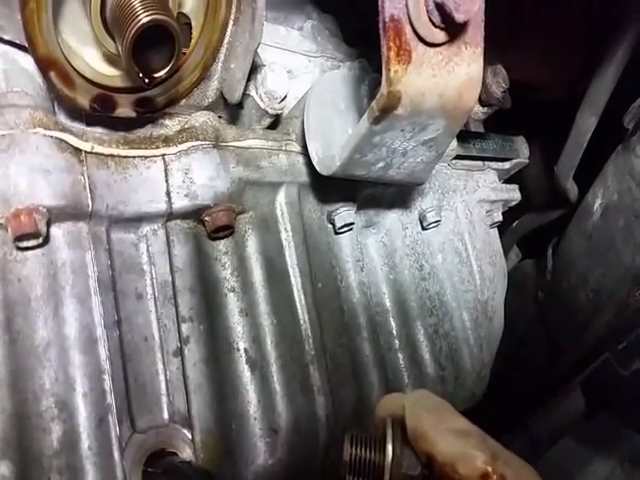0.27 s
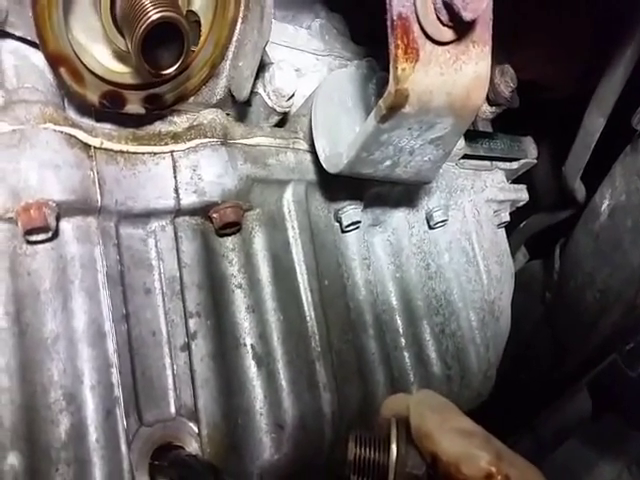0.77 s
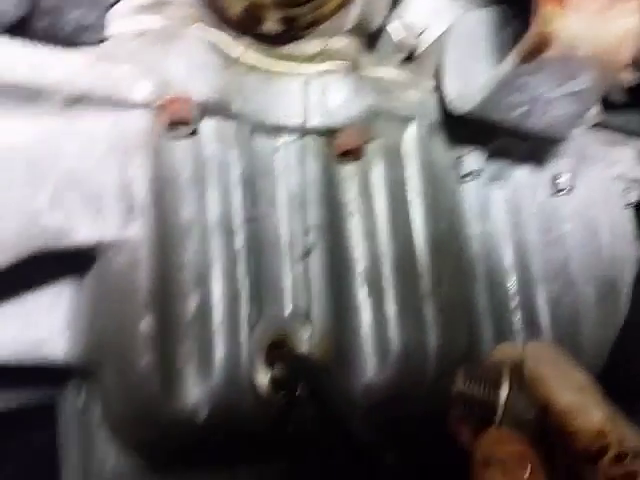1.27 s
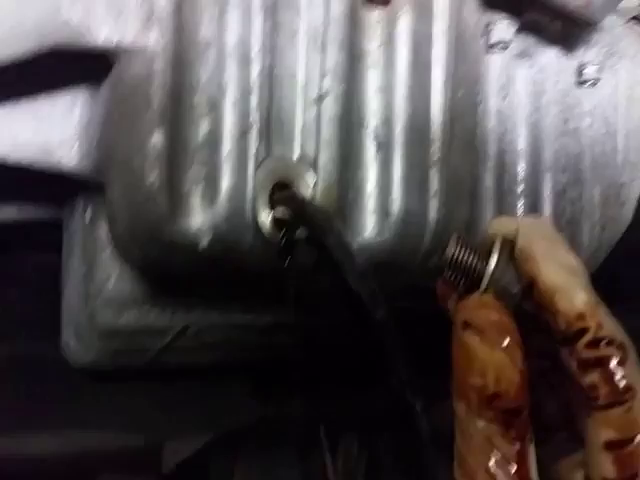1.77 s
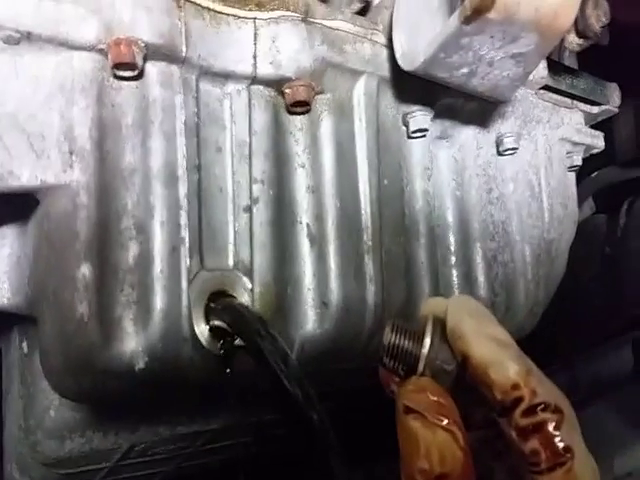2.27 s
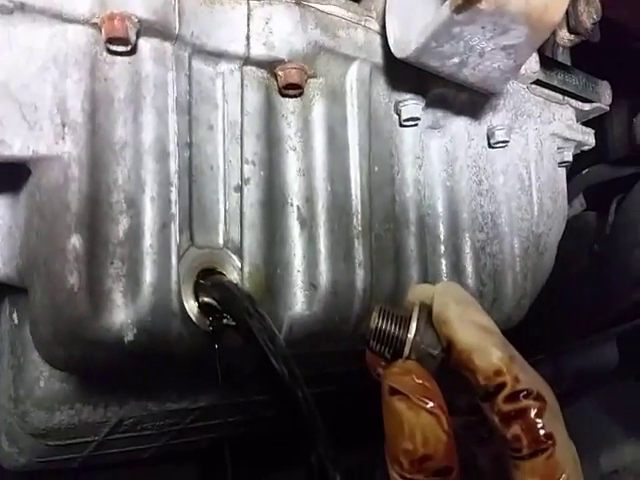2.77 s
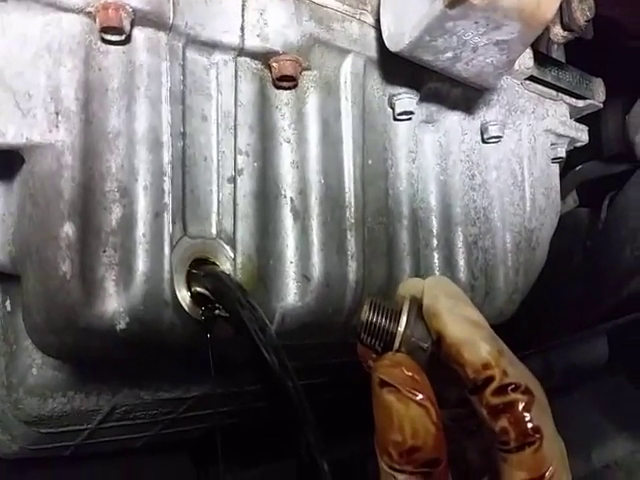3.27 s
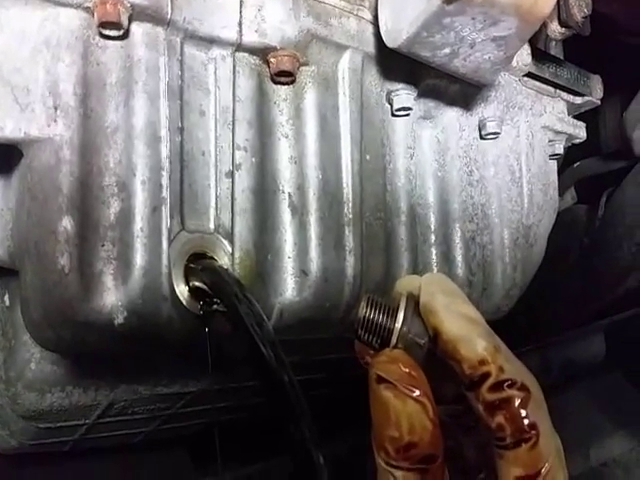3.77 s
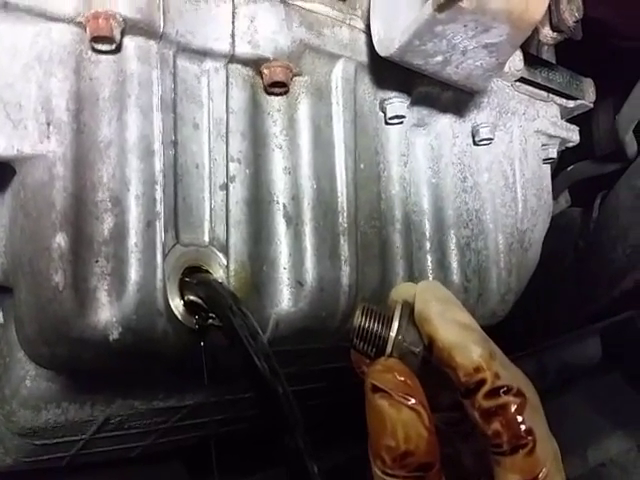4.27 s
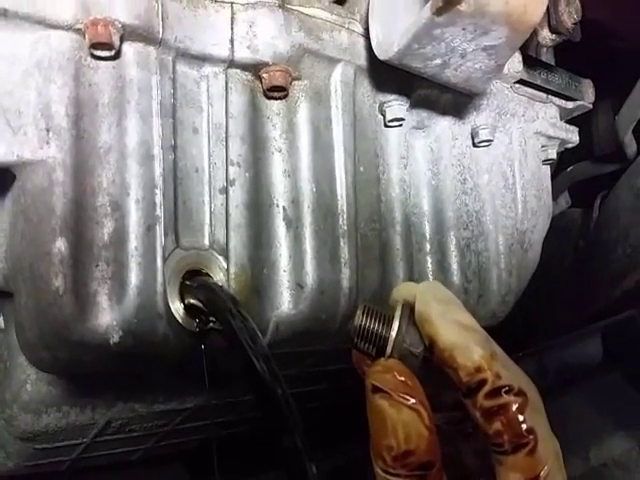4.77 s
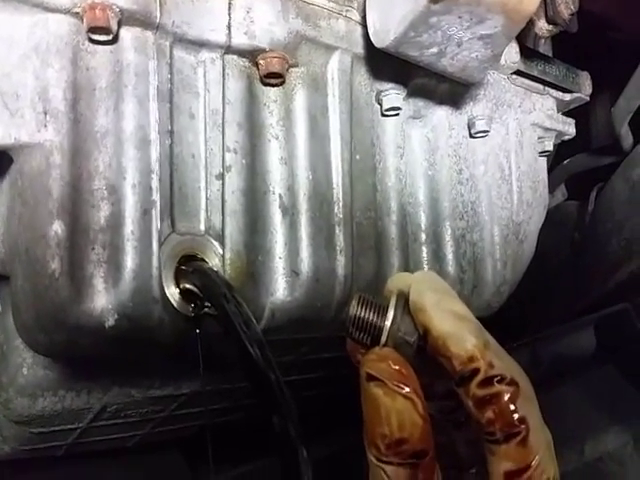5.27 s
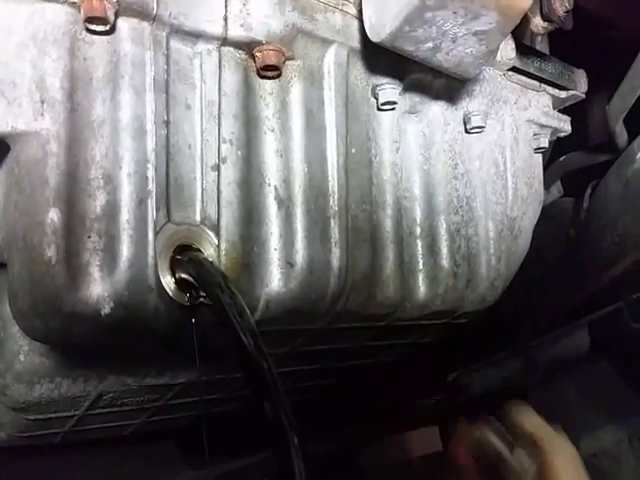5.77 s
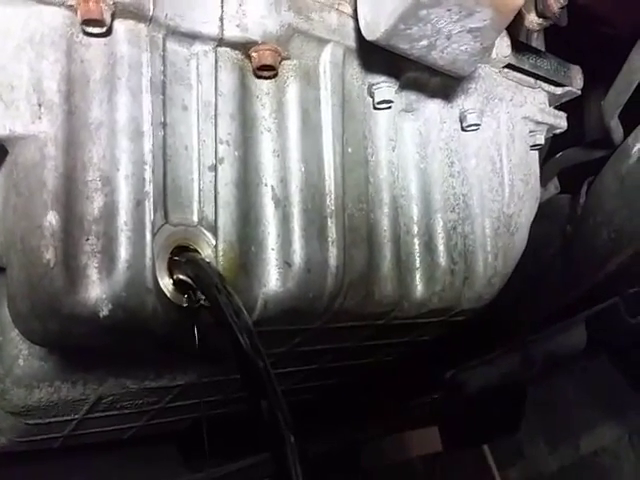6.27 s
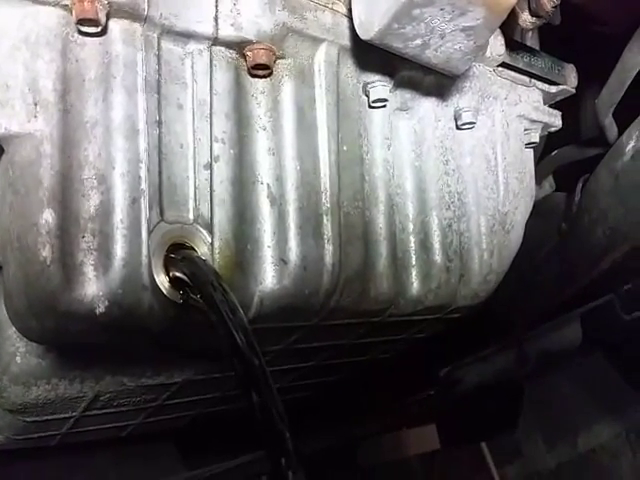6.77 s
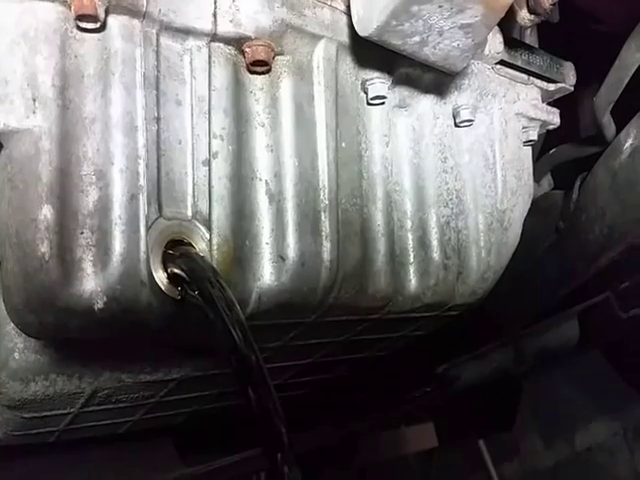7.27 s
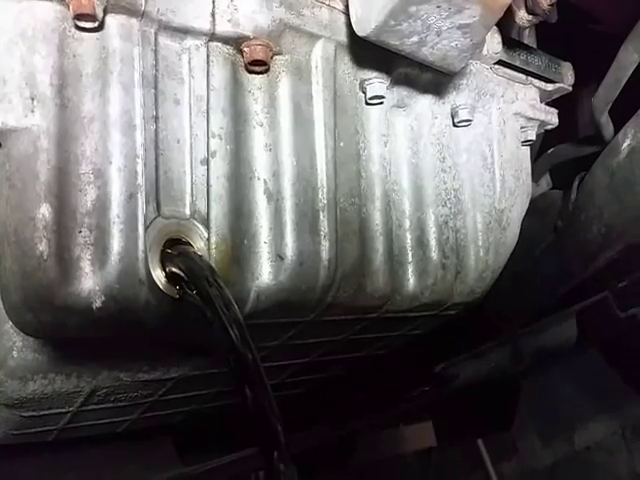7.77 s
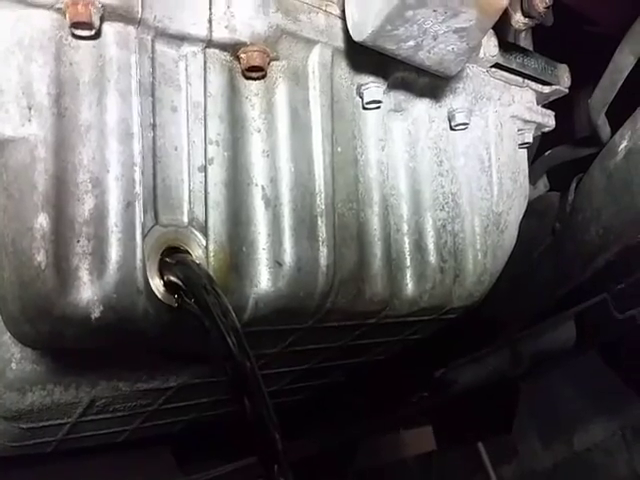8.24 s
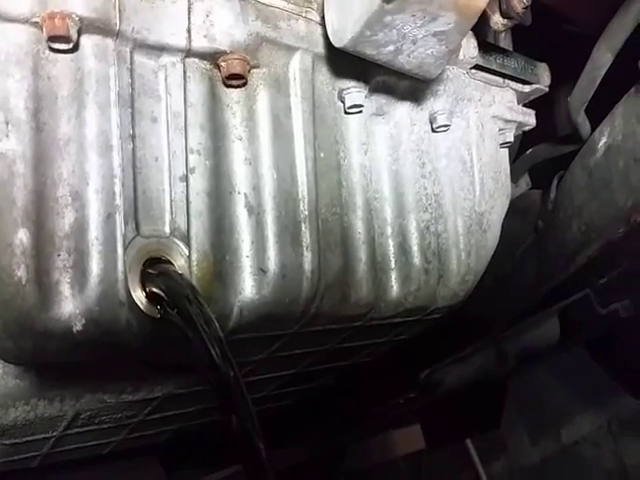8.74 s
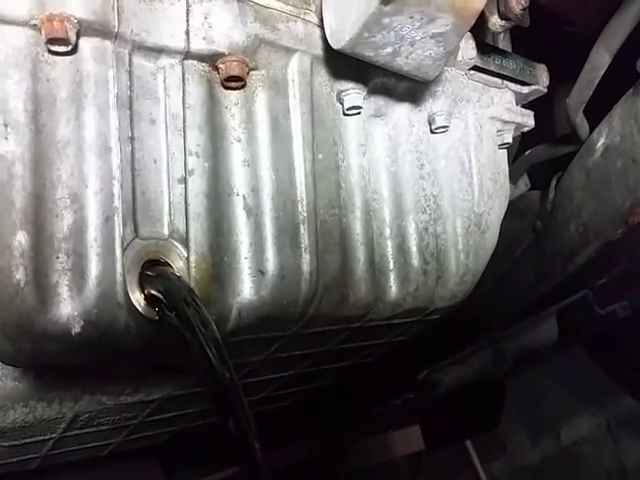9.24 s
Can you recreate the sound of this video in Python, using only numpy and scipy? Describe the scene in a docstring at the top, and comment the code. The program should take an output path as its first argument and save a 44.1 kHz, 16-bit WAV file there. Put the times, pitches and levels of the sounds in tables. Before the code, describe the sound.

A close, hand-held stereo microphone sits beneath a car. At first there is faint air and low rumble, with a tiny knock at the start; a wavering deep hum swells around 1 second. At 1.3-1.6 a dull knock, a soft thud and two quick cloth rasps mark a hand moving. From about 2.2 oil splashes into a hollow pan slightly right: small high bubble chirps, crisp ticks and watery pops, ringing with short echoes over a faint soft rush. It grows gradually denser, easing briefly near 4.4. Muffled bumps land at 3.0, 3.8, 5.7 and 6.1-6.2, with light knocks near 3.6. From 6.1 to 6.8 lower glugs, thick spatter and bright snaps peak, then splashing stops. Knocks follow near 7.0; the rush fades around 7.6. Hum and rumble continue, with a faint cloth stroke, squeak and thud around 8.7 and tiny taps at 9.

```python
"""Warm engine oil runs from a sump into a catch pan under a car, heard from a hand-held camera close by.
For some seconds it splashes: bubbles chirp as sweeping sines, films pop and film snaps tick as noise bursts,
thicker gobs spatter as grainy noise, and all of it rings in the resonances and echoes of the pan.
Wavering tones and filtered noise make the workshop's hum, rumble and air; the hand bumps the camera with
sinking thuds, handled things knock as damped noise; coloured noise makes sleeve strokes and a soft long rush."""
import sys
import numpy as np
from scipy import signal
from scipy.fft import rfft, irfft, next_fast_len
from scipy.io import wavfile
from scipy.ndimage import uniform_filter1d

SR = 44100
rng = np.random.default_rng(int(sys.argv[2]) if len(sys.argv) > 2 else 0)


def master_out(mix):
    """Clip the mix to full scale and print it as 16-bit PCM to the path in sys.argv[1]."""
    frames = np.transpose(np.atleast_2d(mix))
    ceiling = np.clip(frames, -1, 1)
    pcm = np.round(ceiling * 32767).astype(np.int16)
    wavfile.write(sys.argv[1], SR, pcm)


N = 419346
TIME = np.arange(N) / SR

SPOT_COUNT = 4  # places in the pan where the oil splashes
# the stream splashes between these times, with these fades
SPLASH_START_S, SPLASH_STOP_S, SPLASH_ATTACK_S, SPLASH_RELEASE_S = 2.17, 6.8, 0.083, 0.09
FLOW_DB = -66  # relative strength of the stream as it starts, before the pan's own gain
SNAP_S = 0.00043  # decay of a film's sharp snap

# Spectrum of fine fizz and spray. Each row: frequency in Hz, level in dB.
FIZZ_SPECTRUM = [(600, -18), (1300, -4.5), (2600, -9), (4200, -7), (5200, -7.5), (8000, -6), (12500, -14.5),
                 (16000, -20)]


def undb(db):
    """Decibels to gain."""
    return 10 ** (np.asarray(db) / 20)


def unit(x):
    """Scale to rms 1."""
    return x / np.sqrt(np.mean(x ** 2))


def curve(table):
    """Rows of (s, value), joined by straight lines in time."""
    return np.interp(TIME, *np.transpose(table))


def colour(x, points):
    """Filter by a spectrum of (Hz, dB) points; rms 1."""
    hz, db = np.transpose(points)
    size = next_fast_len(N)
    f = np.maximum(np.fft.rfftfreq(size, 1 / SR), 1)
    gain = undb(np.interp(np.log(f), np.log(hz), db))
    return unit(irfft(rfft(x, size) * gain, size)[..., :N])


def resonate(x, hz, q):
    """One resonance, gain 1 at its centre."""
    w = 2 * np.pi * min(hz / SR, 0.45)
    a = np.sin(w) / (2 * q)
    return signal.lfilter([a, 0, -a], [1 + a, -2 * np.cos(w), 1 - a], x)


def walk(rate):
    """Random levels, a new one every 1 / rate s, joined by smooth slews; rms near 1."""
    k = int(SR / rate)
    steps = np.repeat(rng.standard_normal(N // k + 1), k)
    return unit(uniform_filter1d(steps, k)[:N])


def pan(x, left_db):
    """Lean a sound to the left by so many dB; negative leans right."""
    return x * undb(np.array([[left_db], [-left_db]]) / 2)


def stereo_noise(side_db):
    """White noise on two channels, with the side part at so many dB against the middle."""
    mid, side = rng.standard_normal((2, N))
    return mid + undb(side_db) * np.array([side, -side])


def add(track, s, sound):
    """Mix a sound in at a time."""
    i = int(s * SR)
    track[..., i:i + sound.shape[-1]] += sound[..., :N - i]


def echoes(x, t60, gap_s):
    """Dense decaying reflections that start after a gap, different at each ear; energy 1."""
    t = np.arange(SR // 2) / SR
    tail = rng.standard_normal((2, len(t))) * undb(-60 * t / t60) * (t > gap_s)
    tail /= np.sqrt(np.sum(tail ** 2, axis=1, keepdims=True))
    return signal.fftconvolve(np.atleast_2d(x), tail, axes=1)[:, :N]


def swell(s, width_s):
    """A gain that rises to 1 at a time and dies away again."""
    return 1 / np.cosh(np.clip((TIME - s) / width_s, -30, 30))


def hold(start_s, stop_s, attack_s, release_s):
    """Straight attack, hold and exponential release."""
    attack = np.clip((TIME - start_s) / attack_s, 0, 1)
    return attack * np.exp(-np.maximum(TIME - stop_s, 0) / release_s)


def flow(growth_db_per_s=1.6, lull_s=4.42, lull_width_s=0.15, lull_db=-11):
    """How hard the stream splashes: it grows as the pan fills and runs more smoothly for one moment."""
    db = FLOW_DB + growth_db_per_s * (TIME - SPLASH_START_S) + lull_db * swell(lull_s, lull_width_s)
    return undb(db) * hold(SPLASH_START_S, SPLASH_STOP_S, SPLASH_ATTACK_S, SPLASH_RELEASE_S)


def tone(hz, drift_hz=0.47, waver_db=3.0):
    """A humming line that wavers slightly in pitch and level; rms near 1."""
    phase = 2 * np.pi * np.cumsum(hz + drift_hz * walk(2.98)) / SR
    return np.sqrt(2) * np.sin(phase) * undb(waver_db * walk(6))


def workshop():
    """Hum is alike at both ears and rumble nearly so; stream and hand add to the rumble; the air is diffuse."""
    # The main hum swelling and fading. Each row: time in seconds, relative level in dB.
    hum_levels = [(0, -71), (.62, -69), (.8, -50), (1.3, -44.5), (2.0, -51.5), (2.65, -47), (3.2, -50.5),
                  (4.3, -62.5), (5.0, -52.5), (6.2, -57), (7.9, -53.5), (9.5, -71)]
    # Steady tones beside it. Each row: frequency in Hz, relative level in dB.
    side_tones = [(58.3, -62), (99, -60.5), (129.5, -69)]
    # Rumble of the shifting hand. Each row: centre in seconds, relative level in dB, swell width in seconds.
    hand_shifts = [(1.45, -51.5, 0.76), (2.9, -54.5, 0.34), (7.3, -54, 0.71), (8.72, -54, 0.15)]
    # Spectrum of the rumble. Each row: frequency in Hz, level in dB.
    rumble_spectrum = [(12, -14), (22, -4), (44, -16.5), (58, 0), (100, 2.5), (160, -3.5), (205, -12.5),
                       (280, -11.5), (360, -17.5), (480, -20.5), (700, -45), (1500, -59.5)]
    # Spectrum of still air and microphone hiss. Each row: frequency in Hz, level in dB.
    air_spectrum = [(200, 4.5), (450, 3.5), (850, 4.5), (1200, -8), (2000, -12.5), (3000, -17.5),
                    (4400, -12.5), (5300, -33.5), (7500, -20), (10000, -40), (12500, -18), (16000, -31.5)]
    hum = tone(hz=82.24) * undb(curve(hum_levels) - 1.5)
    hum = hum + sum(undb(db) * tone(hz) for hz, db in side_tones)

    steady = undb(-55)
    drumming = undb(9) * flow()  # the stream drums on the pan
    shifts = sum(undb(db) * swell(s, width_s) for s, db, width_s in hand_shifts)
    strength = np.sqrt(steady ** 2 + drumming ** 2 + shifts ** 2)
    rumble = colour(stereo_noise(side_db=-9.5), rumble_spectrum) * strength * undb(0.78 * walk(12))

    air = colour(stereo_noise(side_db=0.5), air_spectrum) * undb(-67.5 + 1.3 * walk(13.0))
    return pan(hum + rumble, left_db=-2.0) + pan(air, left_db=-2.0)


def chirp(hz, length_s, octaves, swell_age=0.54, rough=0.45):
    """A bubble's air rings through the hole in its film; pitch glides and flutters as the ragged hole widens."""
    age = np.arange(int(4 * length_s * SR)) / SR / length_s  # in lengths
    smoothing = int(2 * SR / hz)
    flutter, wobble = (unit(uniform_filter1d(row, size=smoothing))
                       for row in rng.standard_normal((2, len(age))))
    pitch = hz * 2 ** (octaves * np.tanh(age - swell_age) + rough * wobble / 10)
    shape = (age / swell_age * np.exp(1 - age / swell_age)) ** 2
    return shape * (1 + rough * flutter) * np.sin(2 * np.pi * np.cumsum(pitch) / SR)


def sleeve_and_rush():
    """Cloth strokes rasp and squeak in uneven steps over a long faint rush, likely the pouring oil's low body."""
    # Strokes of the sleeve. Each row: centre in seconds, relative level in dB, relative hiss of the weave
    # in dB, swell width in seconds.
    stroke_rows = [(1.505, -51, -69, 0.028), (1.588, -55.5, -68, 0.04), (1.87, -72.5, -93, 0.15),
                   (3.8, -65, -83, 0.093), (8.8, -63.5, -91, 0.13)]
    # Spectrum of the strokes and the rush. Each row: frequency in Hz, level in dB.
    soft_spectrum = [(120, -3), (245, 9.5), (330, -3), (450, 1), (900, -5.5), (1400, -10.5), (2500, -20),
                     (4600, -20), (6200, -33), (15000, -46)]
    strokes = sum(undb(db) * swell(s, width_s) for s, db, _, width_s in stroke_rows)
    hiss = sum(undb(db) * swell(s, width_s) for s, _, db, width_s in stroke_rows)
    # a long faint soft rush, likely the low body of the pouring oil
    rush = undb(-64) * hold(start_s=0.77, stop_s=7.56, attack_s=0.59, release_s=0.59)
    soft = colour(stereo_noise(side_db=0.0), soft_spectrum) * (strokes + rush)
    weave = rng.standard_normal((2, N))
    for _ in range(2):
        weave = resonate(weave, hz=4250, q=4)
    squeak = undb(-80) * chirp(hz=3650, length_s=0.06, octaves=-0.3)  # falls in pitch
    add(soft, 8.61, squeak)
    return (soft + unit(weave) * hiss) * undb(1.35 * walk(45))


def knocks():
    """Light knocks of things being handled: short damped noise with a little of the space under the car."""
    # Each row: start in seconds, centre in Hz, relative level in dB, decay in seconds.
    knock_rows = [(0.023, 2000, -57, 0.0041), (0.165, 4170, -70, 0.003), (1.274, 386, -36.5, 0.0065),
                  (1.276, 860, -55, 0.016), (1.293, 2900, -60, 0.004), (1.308, 840, -53.5, 0.017),
                  (1.392, 368, -42.5, 0.011), (1.822, 3200, -64, 0.01), (1.824, 1090, -60, 0.02),
                  (2.042, 1660, -58, 0.0043), (3.555, 410, -43.5, 0.0099), (3.584, 900, -45.5, 0.0065),
                  (3.762, 1370, -54.5, 0.017), (6.133, 950, -47.5, 0.011), (6.937, 690, -47.5, 0.013),
                  (6.955, 1720, -44.5, 0.0049), (6.956, 900, -46.5, 0.0083), (7.033, 2460, -59.5, 0.021),
                  (9.024, 840, -56, 0.011), (9.044, 900, -58.5, 0.012), (9.122, 4400, -70, .004)]
    out = np.zeros(N)
    t = np.arange(SR // 10) / SR
    for (s, hz, db, decay_s), noise in zip(knock_rows, rng.standard_normal((len(knock_rows), len(t)))):
        body = unit(resonate(resonate(noise, hz, 4.1), hz, 0.77))
        add(out, s, undb(db - 3.0) * body * np.exp(-t / decay_s))
    return pan(out + undb(-3.0) * echoes(out, t60=0.059, gap_s=0.0087), left_db=-7.5)


def bumps(rise_s=0.0033, sag=0.2):
    """The hand bumps the camera body, which gives a soft dull thud that sinks in pitch and dies fast."""
    # Each row: start in seconds, pitch it sinks to in Hz, relative level in dB.
    bump_rows = [(1.385, 154, -36.5), (2.986, 100, -39), (3.791, 110, -33.5), (5.741, 124, -33),
                 (6.115, 94, -33.5), (6.23, 99, -34.5), (8.667, 89.5, -40.5)]
    out = np.zeros(N)
    t = np.arange(SR // 10) / SR
    shape = t / rise_s * np.exp(1 - t / rise_s)
    for (s, hz, db), noise in zip(bump_rows, rng.standard_normal((len(bump_rows), len(t)))):
        phase = 2 * np.pi * np.cumsum(hz * (1 + sag * np.exp(-t / 0.0044))) / SR
        dull_noise = unit(resonate(resonate(noise, 213, 1.3), 213, 1.3))
        thud = np.sin(phase) + undb(-9.0) * dull_noise
        add(out, s, undb(db) * thud * shape)
    return pan(out, left_db=11.0)


def crackle(grain_db):
    """Fine crackling: noise whose size changes about every millisecond, up to a largest grain."""
    size = np.minimum(walk(900), 2)
    return rng.standard_normal(N) * undb(grain_db * size)


def spatter(grain_db=5, spray_lag=1.54):
    """Thick gobs slosh low in the pan; bright spray follows in a shorter burst. Returns slosh and spray."""
    # Each row: slosh centre in seconds, relative slosh in dB, relative spray in dB, swell width in seconds.
    gobs = [(6.252, -53, -57, 0.021), (6.39, -50.5, -66, 0.017), (6.439, -45, -39.5, 0.028),
            (6.64, -57.5, -87, 0.13)]
    # Spectrum of the slosh. Each row: frequency in Hz, level in dB.
    slosh_spectrum = [(120, -16), (280, 0.5), (480, -1), (750, -5.5), (1600, -13.5), (2600, -13),
                      (5000, -21.5), (12000, -30)]
    slosh = sum(undb(db) * swell(s, width_s) for s, db, _, width_s in gobs)
    # the spray lands spray_lag swell widths after its gob
    spray = sum(undb(db) * swell(s + spray_lag * width_s, 0.42 * width_s) for s, _, db, width_s in gobs)
    low = colour(crackle(grain_db), slosh_spectrum) * slosh * undb(walk(90))
    bright = colour(crackle(grain_db), FIZZ_SPECTRUM) * (spray + undb(-7.5) * slosh)
    return low, bright


def patter(count=130, scatter_db=12.5):
    """Lesser clicks fall at random as tiny decaying noise bursts; rms near 1 over all spots together."""
    # Spectrum of the lesser clicks. Each row: frequency in Hz, level in dB.
    patter_spectrum = [(1200, -9.5), (4000, -5), (16000, -9.5)]
    out = np.zeros((SPOT_COUNT, N))
    t = np.arange(SR // 100) / SR
    for noise in rng.standard_normal((count, len(t))):
        when, size, place = rng.random(3)
        click = undb(scatter_db * size) * noise * np.exp(-t / SNAP_S)
        add(out[int(place * SPOT_COUNT)], when * N / SR, click)
    return colour(out, patter_spectrum) / np.sqrt(SPOT_COUNT)


def film_snaps(ring_q=6.9, ring_db=1.5, tail_s=0.0027, tail_db=-8):
    """A bubble's film snaps with a very short bright click of its own pitch and a fainter, longer tail."""
    # Each row: start in seconds, relative level in dB.
    snap_rows = [(2.2605, -46), (2.53, -51), (2.6547, -44), (2.9532, -44), (3.0, -57), (3.0299, -50),
                 (3.1398, -48), (3.3793, -47.5), (3.463, -50), (3.507, -40.5), (3.673, -53), (3.7099, -46),
                 (3.816, -49), (3.906, -44.5), (4.0308, -44.5), (4.0722, -44), (4.766, -51), (4.8, -40),
                 (4.9935, -55), (5.0234, -56), (5.266, -43.5), (5.308, -42), (5.456, -36), (5.5572, -51),
                 (5.7085, -36.5), (5.791, -45), (5.845, -50), (5.9417, -48), (6.033, -49), (6.2601, -42.5),
                 (6.529, -40.5), (6.636, -42), (6.66, -37.5), (6.7, -30), (6.736, -34), (6.7665, -39),
                 (7.9328, -58.5)]
    # Spectrum of the snaps. Each row: frequency in Hz, level in dB.
    snap_spectrum = [(1000, -19), (3000, -2), (8000, 2.5), (11500, 3), (16000, -2)]
    out = np.zeros((SPOT_COUNT, N))
    t = np.arange(SR // 50) / SR
    shape = np.exp(-t / SNAP_S) + undb(tail_db) * np.exp(-t / tail_s)
    for (s, db), noise in zip(snap_rows, rng.standard_normal((len(snap_rows), len(t)))):
        hz = 11540 * 2 ** (0.23 * rng.uniform(-0.96, 1))
        burst = shape * noise
        click = unit(burst) + undb(ring_db) * unit(resonate(burst, hz, ring_q))
        add(out[rng.integers(SPOT_COUNT)], s, undb(db) * np.std(shape) * unit(click))
    return colour(out, snap_spectrum) * np.std(out)


def pops(decay_s=0.0011, squirt_db=-7, squirt_s=0.0029, climb=0.89):
    """Air squirts through a thinning film in a rising whistle, then the film pops."""
    # Each row: time of the pop in seconds, relative level in dB, centre in Hz.
    pop_rows = [(1.0348, -47.5, 7060), (2.2588, -44.5, 7960), (2.332, -44.5, 8320), (2.406, -44, 8300),
                (2.6558, -44, 8290), (2.893, -48, 6400), (2.995, -44.5, 8300), (3.086, -48, 6370),
                (3.1417, -48, 8070), (3.453, -47, 7090), (3.4633, -52, 5720), (3.508, -42, 8330),
                (3.588, -41.5, 7090), (3.711, -43.5, 8350), (3.752, -46, 8420), (3.816, -43, 6000),
                (3.907, -42.5, 7080), (4.03, -56, 5940), (4.072, -42.5, 5950), (4.322, -45.5, 7640),
                (4.6582, -40, 6470), (4.7665, -47, 5880), (4.802, -42, 10600), (4.914, -42.5, 5960),
                (5.4557, -41.5, 8430), (5.5994, -37, 8150), (5.7069, -36, 5910), (5.7647, -42, 5940),
                (5.831, -42, 5580), (5.942, -50, 5770), (6.003, -43, 7050), (6.021, -40.5, 6130),
                (6.1134, -37.5, 5920), (6.206, -36.5, 6600), (6.631, -36.5, 6870), (6.6598, -36, 7240),
                (6.6986, -36, 8410), (6.738, -35, 5300), (6.766, -45, 6260), (6.879, -42, 7900)]
    out = np.zeros((SPOT_COUNT, N))
    t = np.arange(-SR // 50, SR // 50) / SR  # 0 at the pop
    shape = (t >= 0) * np.exp(-np.abs(t) / decay_s)
    swelling = np.where(t < 0, np.exp(t / squirt_s), shape)
    for (s, db, hz), noise in zip(pop_rows, rng.standard_normal((len(pop_rows), len(t)))):
        # a bright snap at the film's own pitch over a broader splash
        burst = shape * noise
        snap = unit(resonate(burst, hz, 6.0)) + undb(-12) * unit(resonate(burst, hz, 0.84))
        pitch = hz * 2 ** (climb * np.tanh(t / 0.0092))
        whistle = np.sin(2 * np.pi * np.cumsum(pitch) / SR)
        unsteady = 1 + 0.5 * unit(uniform_filter1d(noise, size=16))
        squirt = undb(squirt_db) * swelling * whistle * unsteady
        add(out[rng.integers(SPOT_COUNT)], s + t[0], undb(db) * (np.std(shape) * unit(snap) + squirt))
    return out


def froth(count=700):
    """Many faint quick bubbles in the foam, mostly middling; big low ones glide less. Rms 1 when summed."""
    out = np.zeros((SPOT_COUNT, N))
    for when, first, second, size, length, place in rng.random((count, 6)):
        smallness = ((first + second) / 2) ** 1.5
        hz = 1650 * 2 ** (2.5 * smallness)
        blip = chirp(hz, (6 + 12 * length) / hz, octaves=0.12 + 1.22 * smallness)
        add(out[int(place * SPOT_COUNT)], when * N / SR, undb(21.3 * size ** 2) * blip)
    return out / np.std(out.sum(axis=0))


def scatter(count):
    """Lesser bubbles at uneven gaps while the stream splashes, following its flow: rows (s, dB, Hz)."""
    # One row: level above the flow in dB, scatter in dB, middle pitch in Hz, scatter in octaves.
    small_kind = (9, 2.5, 2850, 0.4)
    above_db, spread_db, hz, octaves = small_kind
    when, size, pitch = rng.standard_normal((count, 3)).T
    span = [SPLASH_START_S + SPLASH_ATTACK_S, SPLASH_STOP_S + SPLASH_RELEASE_S]
    s = np.interp(np.arange(count) + 0.5 * when, [0, count], span)
    flow_db = 20 * np.log10(np.interp(s, TIME, flow()) + 1e-9)
    db = flow_db + above_db + spread_db * np.clip(size, -2, 1)
    return np.column_stack([s, db, hz * 2 ** (octaves * np.clip(pitch, -2, 2))])


def bubbles(small, lead=0.2022):
    """Bubbles chirp as they open, from low glugs to high blips; bigger ones ring longer and tend to climb less."""
    # The clear bubbles. Each row: time in seconds, relative level in dB, pitch in Hz.
    clear = [(2.221, -50, 2400), (2.359, -54, 2880), (2.376, -53, 3900), (2.458, -38.5, 3500),
             (2.4665, -40.5, 2870), (2.472, -42.5, 4170), (2.603, -49.5, 3500), (2.655, -45.5, 3100),
             (2.878, -56, 3040), (2.926, -54, 3150), (2.988, -47, 3040), (2.998, -46, 2670),
             (3.034, -50.5, 2550), (3.134, -42, 2860), (3.139, -43, 1983), (3.191, -46.5, 3760),
             (3.3005, -43.5, 3640), (3.328, -48, 3040), (3.38, -51, 2750), (3.463, -41.5, 4250),
             (3.464, -47.5, 2310), (3.496, -49, 2410), (3.51, -51, 2870), (3.576, -51.5, 2610),
             (3.593, -48, 2545), (3.643, -49, 3780), (3.658, -50, 2480), (3.721, -42, 3800),
             (3.793, -49.5, 2970), (3.811, -45, 4300), (3.907, -49.5, 2325), (3.945, -46, 2660),
             (3.959, -40.5, 3410), (4.0716, -51, 3050), (4.1175, -47.5, 2960), (4.198, -51, 2850),
             (4.3236, -46, 2780), (4.36, -51, 2310), (4.388, -44.5, 2670), (4.389, -52, 3920),
             (4.489, -50, 4280), (4.649, -41, 3900), (4.7177, -41, 2750), (4.733, -45.5, 3870),
             (4.7668, -44, 2060), (4.805, -45, 3830), (4.815, -46, 2300), (4.854, -49, 2990),
             (4.894, -42.5, 2970), (4.904, -41, 2120), (4.909, -37, 3780), (4.937, -51, 3000),
             (4.992, -48, 3600), (4.994, -43.5, 1997), (5.034, -50.5, 2050), (5.057, -45.5, 3040),
             (5.091, -52, 3700), (5.1486, -46.5, 3070), (5.2035, -51, 3800), (5.205, -56, 2270),
             (5.307, -40.5, 3640), (5.373, -50.5, 2950), (5.5034, -44, 2700), (5.519, -44.5, 3970),
             (5.5986, -48.5, 2390), (5.6355, -43.5, 2440), (5.666, -50, 2070), (5.7069, -47.5, 2710),
             (5.722, -49, 4390), (5.765, -49, 3930), (5.7992, -47, 2880), (5.9439, -38, 2170),
             (6.048, -43, 4420), (6.0841, -38, 2240), (6.1465, -37, 1630), (6.1903, -42, 4240),
             (6.223, -50.5, 2880), (6.296, -51.5, 1610), (6.343, -45.5, 1590), (6.3719, -42.5, 4020),
             (6.5355, -44, 3500), (6.541, -47, 1580), (6.575, -44, 1550), (6.602, -44, 2400),
             (6.6343, -41, 1890), (6.6595, -38.5, 3040), (6.6996, -41.5, 2980), (6.741, -51, 1980),
             (6.769, -44.5, 3820), (6.846, -40.5, 1547), (6.874, -46.5, 1466)]
    # a bubble of ring_hz rings for about ring_s and climbs by about rise_octaves
    ring_hz, ring_s, ring_power = 2814, 0.0057, 0.91
    rise_octaves, rise_power = 0.33, 2.2
    out = np.zeros((SPOT_COUNT, N))
    rows = np.vstack([clear, small])
    for (s, db, hz), (damping, steepness, place) in zip(rows, rng.random((len(rows), 3))):
        length_s = ring_s * (ring_hz / hz) ** ring_power * 2 ** (0.5 * (damping - 0.5))
        octaves = rise_octaves * (hz / ring_hz) ** rise_power * 2 ** (1.5 * (steepness - 0.5))
        sound = undb(db) * chirp(hz, length_s, octaves)
        add(out[int(place * SPOT_COUNT)], s - lead * length_s, sound)
    return out


def trickle():
    """All splashing sounds ring in the pan and bounce between floor and underbody."""
    # Hollow resonances of the pan and the gap above it. Each row: frequency in Hz, Q, relative level in dB.
    pan_modes = [(1658, 24, -3.5), (2020, 51, -5.5), (2285, 56, -10), (2670, 140, -8.5), (2945, 76, 3),
                 (3250, 110, -11.5), (3870, 25, -3.5), (5920, 26, -3.5), (8280, 37, -2)]
    spots = bubbles(scatter(count=90)) + pops() + undb(3.5) * film_snaps()
    spots += flow() * (undb(-4) * froth() + undb(-5) * patter())
    slosh, spray = spatter()
    spots[0] += undb(-13) * flow() * colour(crackle(grain_db=10), FIZZ_SPECTRUM)
    spots[1] += spray
    spots[2] += slosh
    # foam fizzles on after the splashing
    foam = undb(FLOW_DB - 27) * hold(SPLASH_START_S, SPLASH_STOP_S, attack_s=1, release_s=1)
    spots[3] += foam * colour(crackle(grain_db=7.0), FIZZ_SPECTRUM)

    # the pan lies to the right: each spot reaches the left a few samples late, with its own wall echoes
    direct = sum(np.array([np.roll(spot, lag), spot]) for spot, lag in zip(spots, (14, 4, 2, 11)))
    walls = sum(echoes(spot, t60=0.058, gap_s=0.00079) for spot in spots)
    oil = spots.sum(axis=0)
    hollow = sum(undb(db) * resonate(oil, hz, q) for hz, q, db in pan_modes)
    near = undb(-5.0) * direct + undb(-5.0) * walls + pan(hollow, left_db=-6)
    room = undb(-13.5) * echoes(oil, t60=0.77, gap_s=0.0017)
    return pan(near + room, left_db=-2.0)


def scene():
    """Workshop, handling and oil together."""
    return workshop() + sleeve_and_rush() + knocks() + bumps() + trickle()


def record(dry):
    """The camera cuts the top steeply above 15.9 kHz."""
    low_pass = signal.ellip(10, 0.2, 70, 15900, fs=SR, output="sos")
    return signal.sosfilt(low_pass, dry)


dry = scene()
out = record(dry)
master_out(out)
```